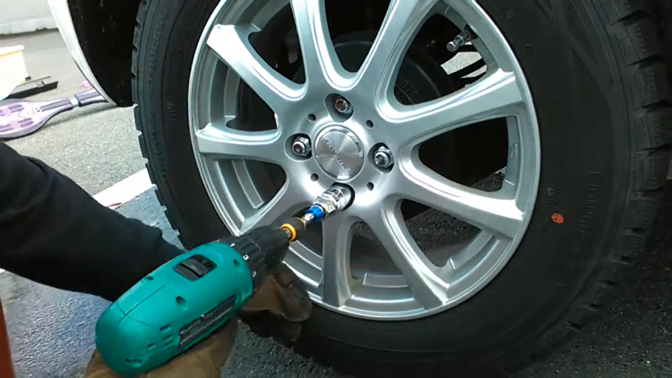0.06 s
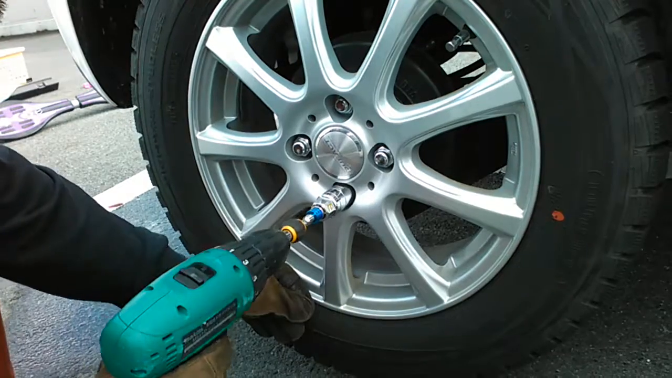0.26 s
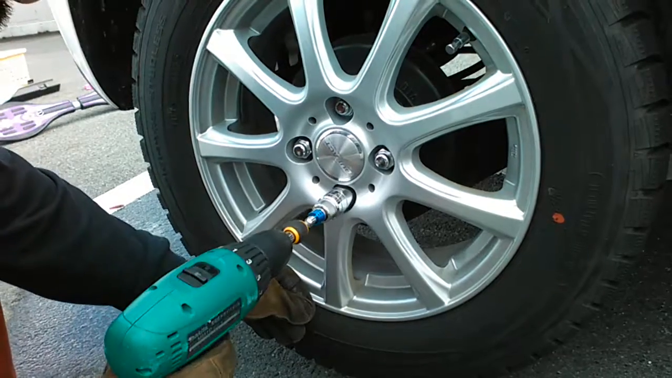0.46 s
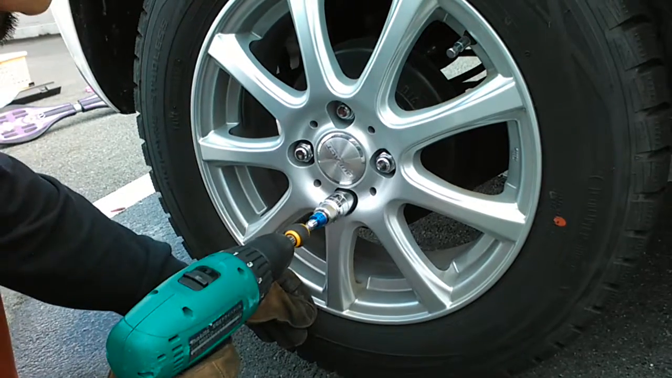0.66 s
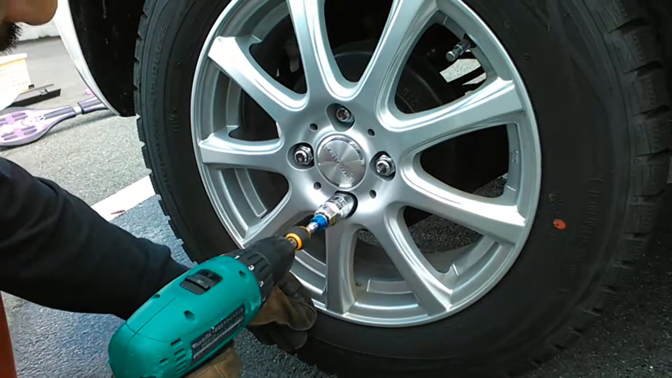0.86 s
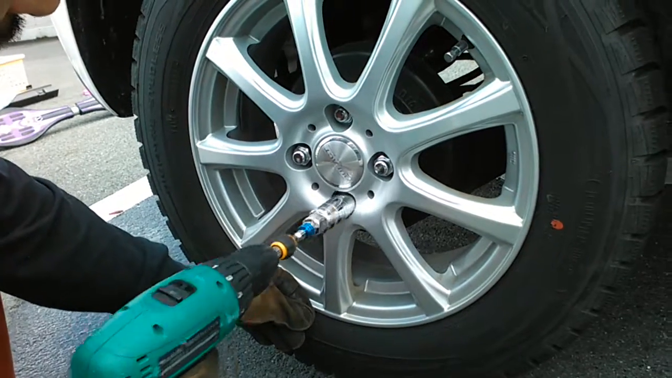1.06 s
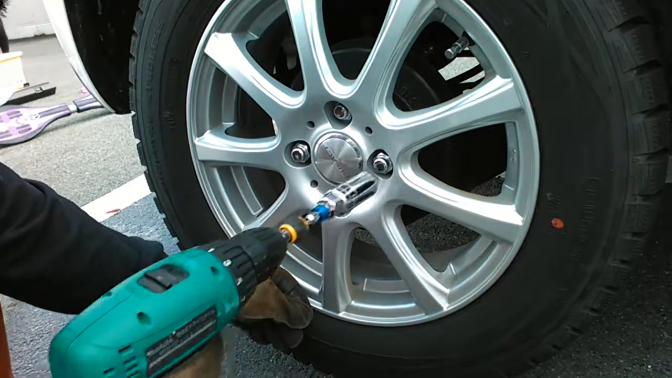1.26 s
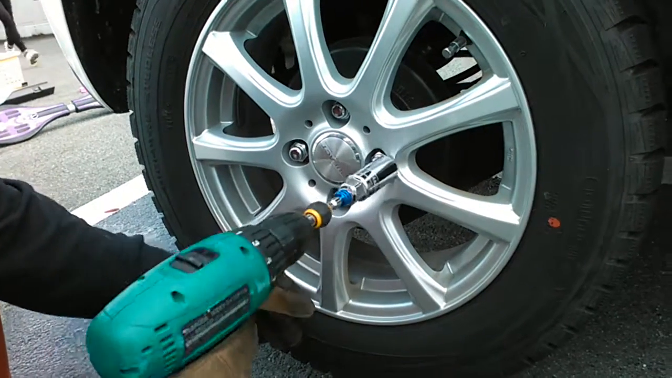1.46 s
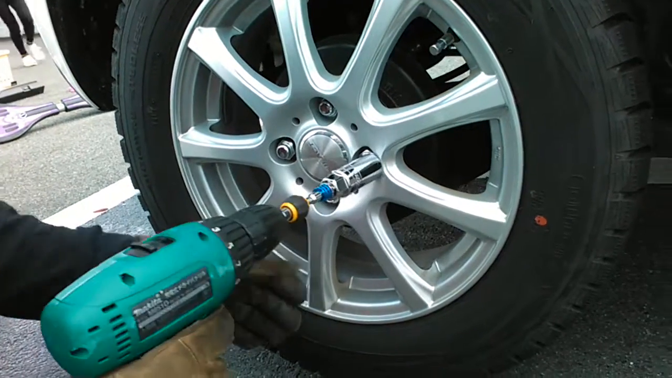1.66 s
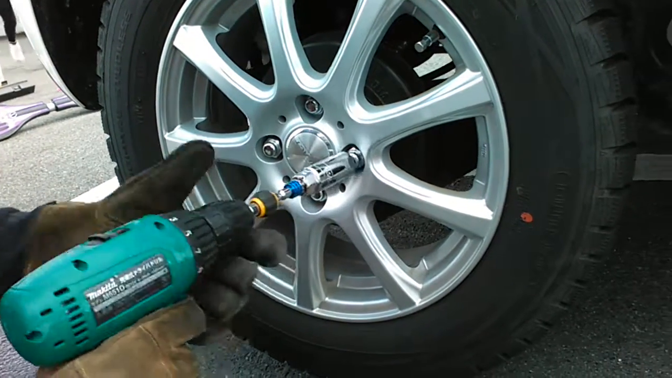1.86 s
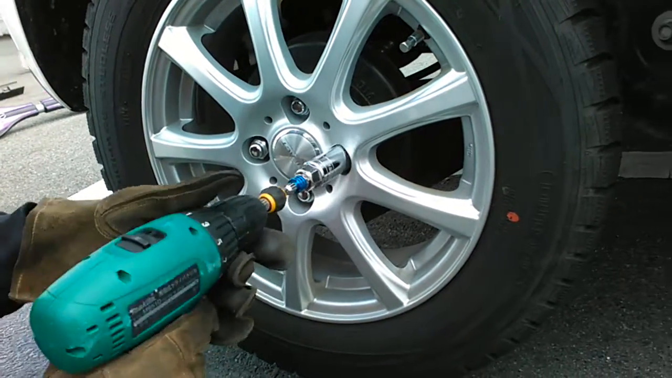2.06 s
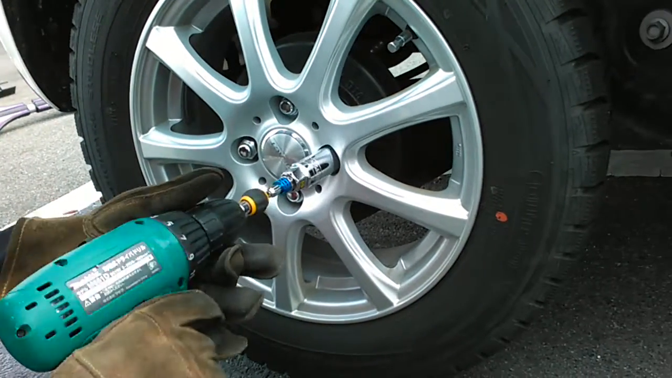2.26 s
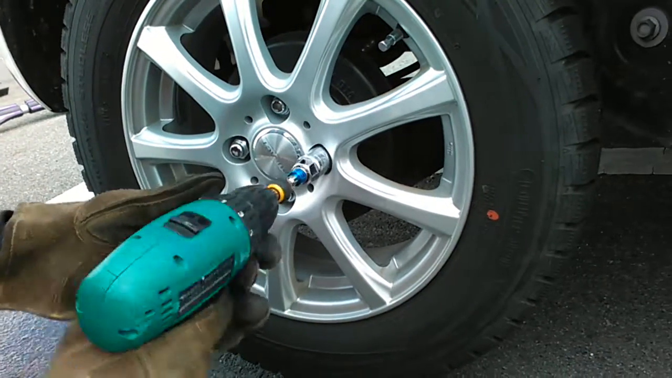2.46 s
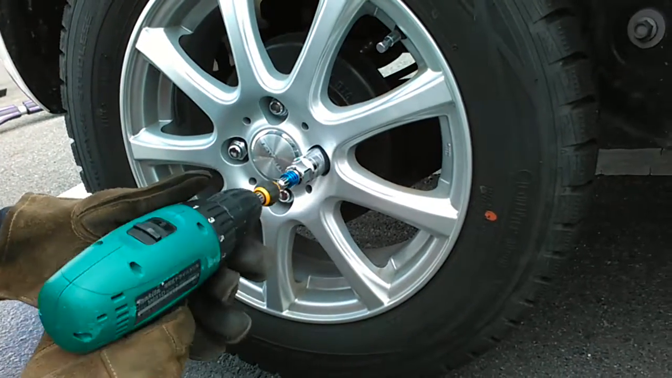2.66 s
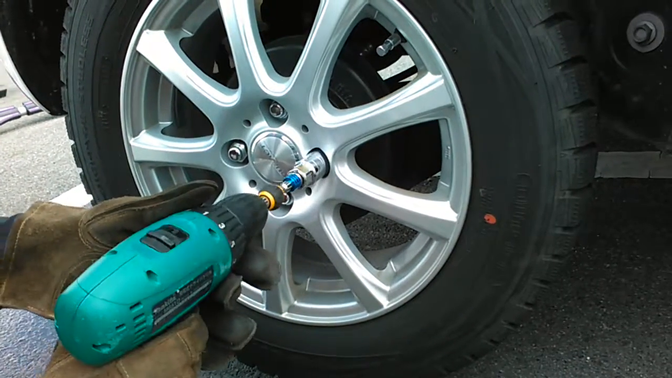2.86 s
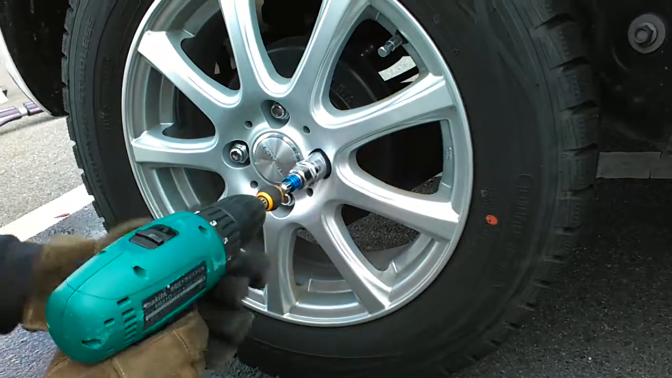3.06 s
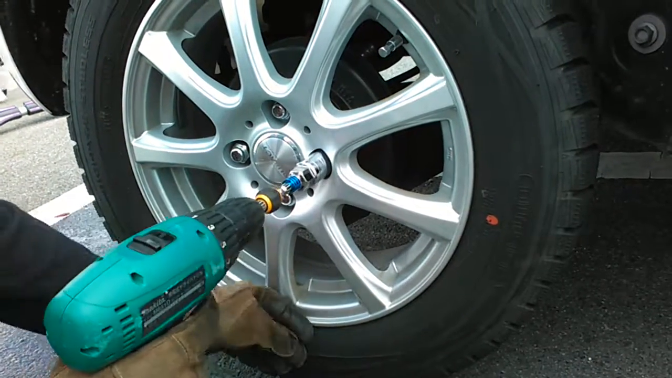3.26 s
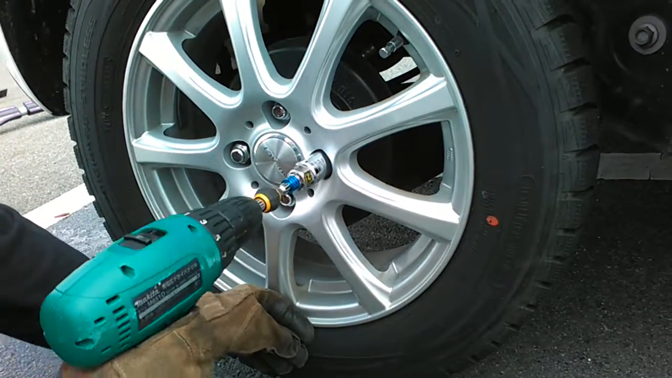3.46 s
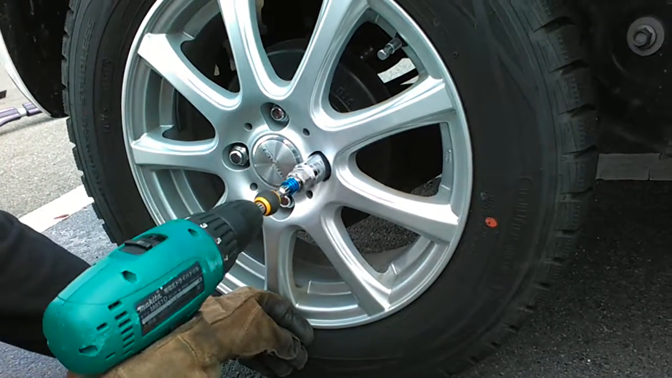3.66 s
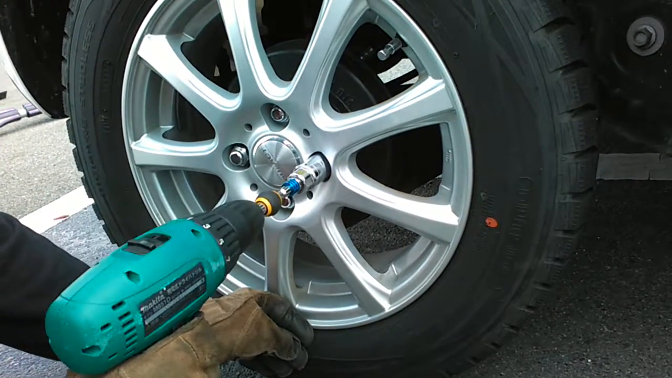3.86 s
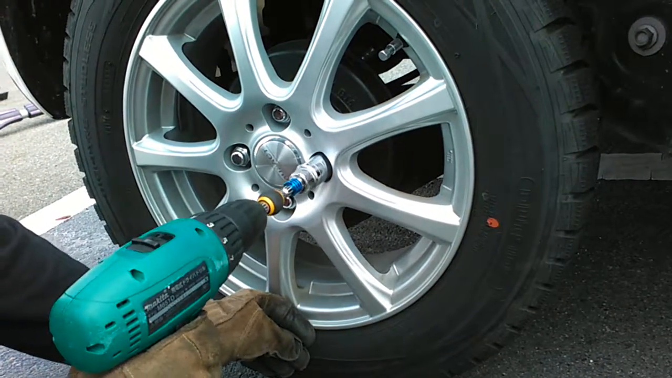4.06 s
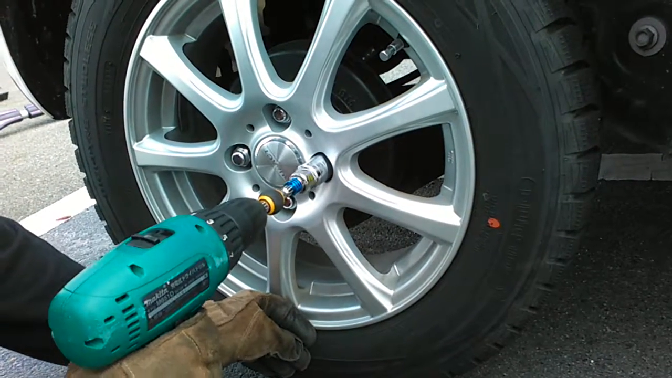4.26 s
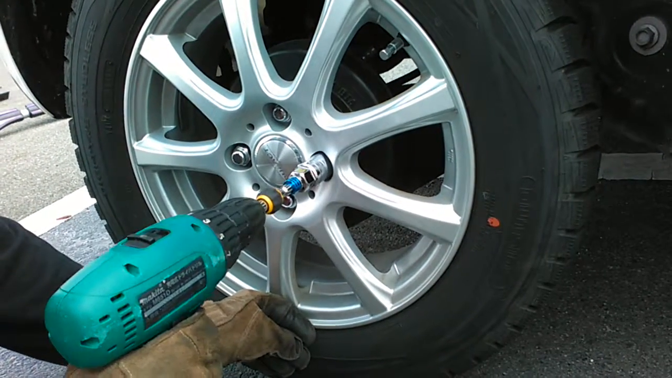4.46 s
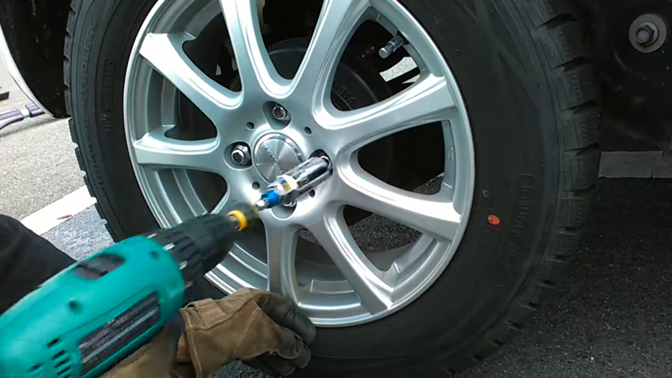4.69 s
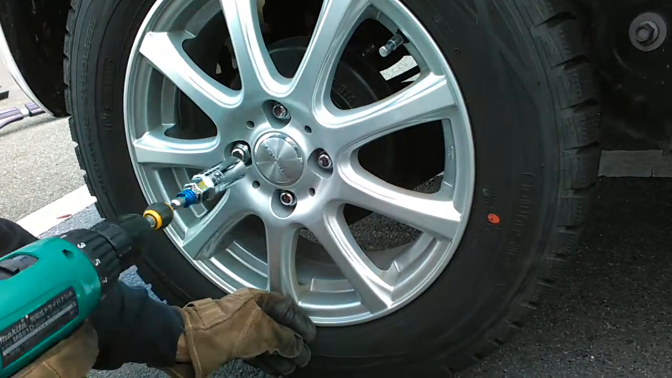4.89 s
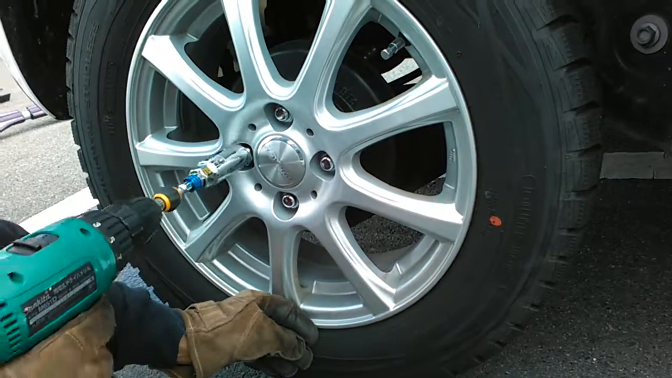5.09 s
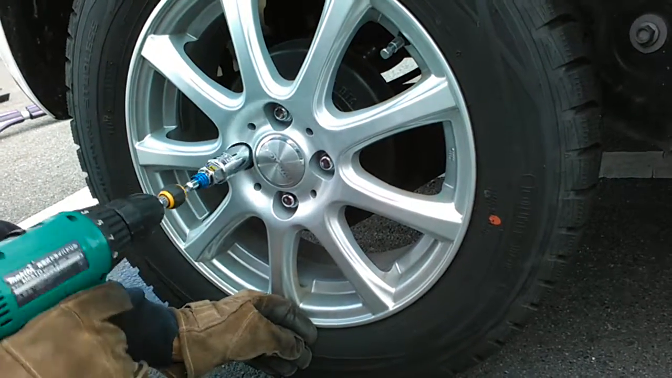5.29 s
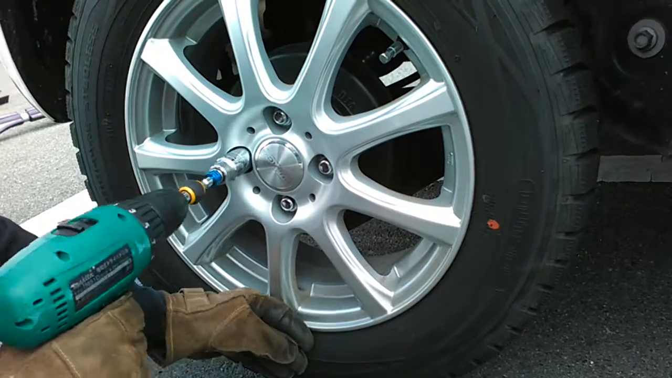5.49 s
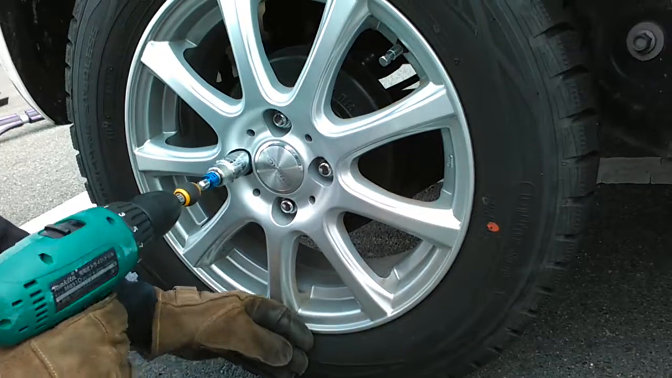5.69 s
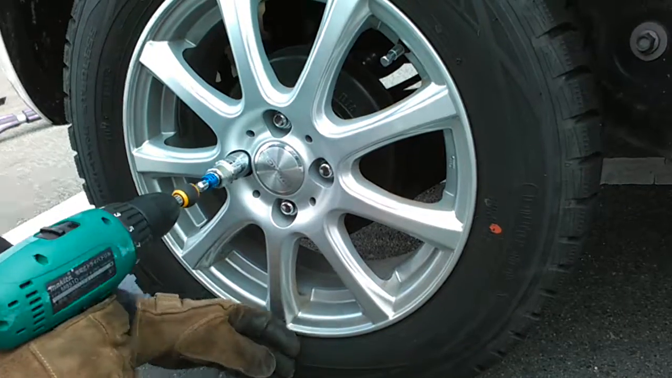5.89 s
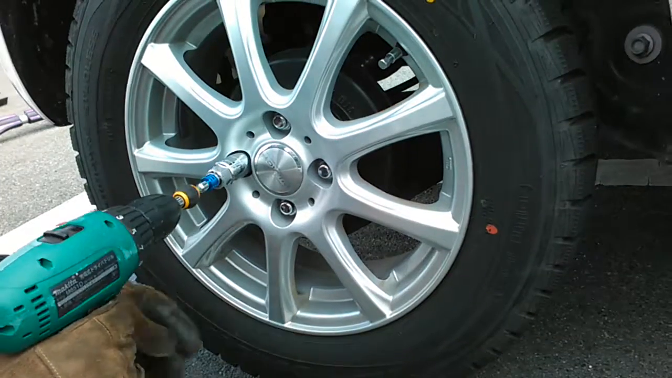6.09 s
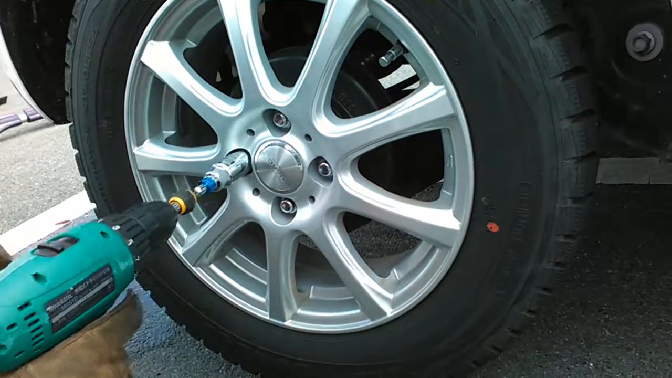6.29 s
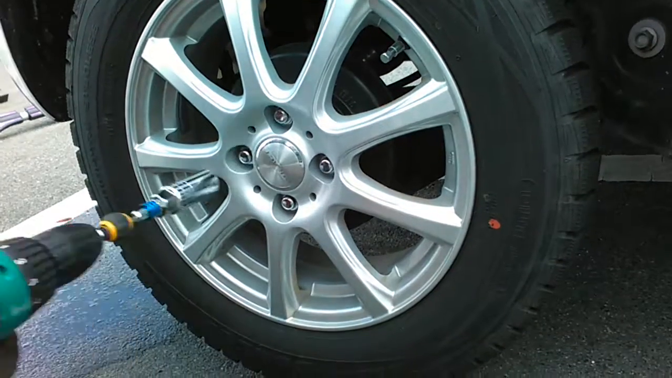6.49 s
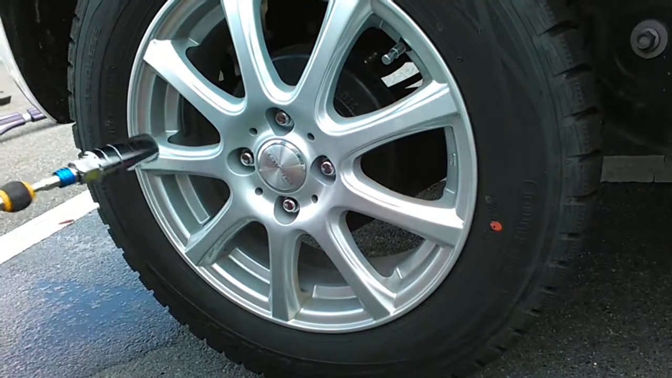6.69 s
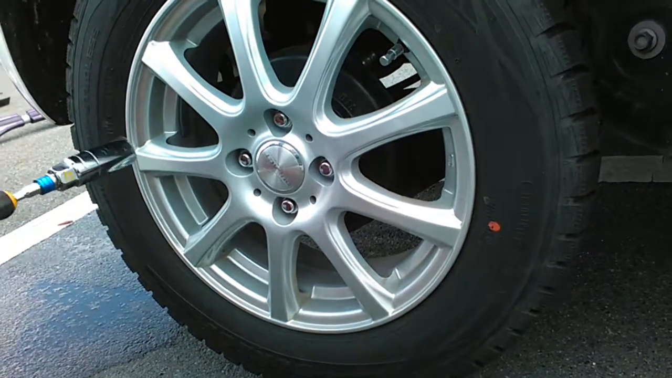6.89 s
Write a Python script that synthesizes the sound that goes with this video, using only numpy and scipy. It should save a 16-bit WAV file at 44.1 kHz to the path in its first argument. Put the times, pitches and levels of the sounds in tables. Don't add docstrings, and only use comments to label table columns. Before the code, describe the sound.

Close and dry outdoors, tiny contacts and a puff of wind come first. At 0.3 s a cordless driver whines up with hiss and light socket ticks; at 0.83 its clutch ratchets loudly, about 130 clicks a second, slowing and stopping by 1.1. The freed steel socket rings thin and high until a knock at 1.4. Small scrapes and knocks follow, stronger at 2.0-2.1 and a solid clunk at 2.46. From 2.64 the driver ratchets, eases and coasts to about 3.2. After clicks at 3.4 it runs in uneven, surging grinds with a faint electronic singing, then a firm ratchet from 4.35 to 4.65. The socket rings again; knocks and bright clinks come at 5.1-5.45. A whine and ticks from 5.5 lead to a sharp clink and final ratchet at 6.0-6.26, then a rattle, a ping and faint scrapes over distant traffic.

```python
import sys
import numpy as np
from scipy import signal
from scipy.fft import rfft, irfft, next_fast_len
from scipy.io import wavfile
from scipy.ndimage import uniform_filter1d

SR = 44100
rng = np.random.default_rng(int(sys.argv[2]) if len(sys.argv) > 2 else 0)


def ratio_of_db(decibels):
    return 10 ** (np.asarray(decibels, float) / 20)


def store_wav(level_fs):
    pcm = np.round(np.clip(np.atleast_2d(level_fs), -1, 1) * 32767)
    wavfile.write(sys.argv[1], SR, pcm.T.astype(np.int16))


N = 306054
T = np.arange(N) / SR


def unit(x):
    return x / np.sqrt(np.mean(x ** 2))


def track(tables, column, rest):
    y = np.full(N, 1. * rest)
    for rows in tables:
        times, values = np.array(rows, float)[:, [0, column]].T
        on = (T >= times[0]) & (T <= times[-1])
        y[on] = np.interp(T[on], times, values)
    return y


def coloured(points):
    hz, db = np.transpose(points)
    f = np.arange(N // 2 + 1) * SR / N + 1
    gain = ratio_of_db(np.interp(np.log(f), np.log(hz), db))
    return unit(irfft(rfft(rng.standard_normal(N)) * gain, N))


def band(x, hz, width):
    return signal.lfilter(*signal.iirpeak(hz, hz / width, fs=SR), x)


def walk(rate):
    hold = int(SR / rate)
    steps = np.repeat(rng.standard_normal(N // hold + 1), hold)
    return uniform_filter1d(steps, hold)[:N]


def tones(hz, orders, wobble_db, rise, body):
    phase = 2 * np.pi * np.cumsum(hz) / SR
    body_hz, body_db = np.transpose(body)
    out = np.zeros(N)
    for multiple, db in orders:
        level = ratio_of_db(db + wobble_db * walk(40) + np.interp(multiple * hz, body_hz, body_db))
        out += level * (hz / hz.max()) ** (rise * (multiple - 1)) * np.sin(multiple * phase)
    return out


def driver():
    rate = jump_rate()
    turns = np.cumsum(rate) / SR
    since = turns % 1 / rate
    ratchet, thud = clutch(turns)
    gear_gain, fan_gain, slip, thud_db = stages(rate)
    jolt = 1 + slip * (1.73 * np.exp(-since / 0.06) - .8)
    stall = slip * np.clip((104 - rate) / 18, 0, .95)
    jolt = jolt * (1 + stall * (3.2 * np.exp(-since / .0035) - 1))
    body = np.sqrt(slip) * ratchet + np.sqrt(1 - slip) * jolt * gears() + ratio_of_db(thud_db) * thud
    hiss = jolt * fan_hiss() + ratio_of_db(-11) * slip * ball_snaps(rate, since)
    return gear_gain * body + fan_gain * hiss + motor_whine() + chopped_current()


def jump_rate():
    # time_s, jumps_per_s
    feathered = [
        [(2.62, 75.5), (2.696, 101.6), (2.736, 112.8), (2.824, 120.9), (2.986, 123.0), (3.024, 115.6),
         (3.124, 88.2), (3.178, 83.5), (3.39, 50)],
        [(3.4, 104), (3.52, 131), (3.59, 115), (3.635, 121), (3.71, 104), (3.8, 114), (4.0, 110), (4.1, 118),
         (4.33, 113)],
    ]
    # start_s, let_go_s, first_jumps_per_s, top_jumps_per_s, coasting_loss (jumps/s per s)
    full_pulls = [
        (.81, 1.012, 120.4, 131.5, 425),
        (4.33, 4.635, 131, 131, 470),
        (5.98, 6.215, 124.3, 130.2, 490),
    ]
    catch_up_s, idle_jumps, last_jumps = .06, 100, 50
    rate = track(feathered, 1, idle_jumps)
    for start, off, first, top, loss in full_pulls:
        pull = top - (top - first) * np.exp(-np.abs(T - start) / catch_up_s) - loss * np.clip(T - off, 0, 1)
        rate = np.where((T >= start) & (T < off + .4), np.maximum(pull, last_jumps), rate)
    return rate


def clutch(turns):
    # pitch_hz, width_hz, level_db
    firm_modes = [(549, 74, -2.5), (988, 180, -5.5), (1300, 220, -5), (1600, 120, 2), (1923, 110, 4.5),
                  (2220, 140, 1), (2780, 350, -3)]
    # pitch_hz, width_hz, level_db
    loose_modes = [(555, 102, -4.2), (890, 92, -6), (1300, 210, -4), (1600, 140, 3), (1912, 170, 2.5),
                   (2250, 200, -4), (2840, 380, -3.5)]
    loose_from_s, loose_to_s = 2.5, 4.3
    jitter_s, scatter_db, rebound_db = .00003, 1.3, -19
    at = np.flatnonzero(np.diff(np.floor(turns)))
    chance = rng.standard_normal((4, len(at)))
    clicks, rebounds = np.zeros(N + 999), np.zeros(N + 999)
    click_at = at + 40 + (jitter_s * SR * chance[0]).astype(int)
    rebound_at = at + 150 + (8 * jitter_s * SR * chance[2]).astype(int)
    clicks[click_at] = ratio_of_db(scatter_db * chance[1])
    rebounds[rebound_at] = ratio_of_db(rebound_db + 2 * scatter_db * chance[3])
    hits = clicks[:N] + np.diff(rebounds[:N + 1]) * 4

    def housing(modes):
        return unit(sum((-1) ** k * ratio_of_db(db) * band(hits, hz, width) for k, (hz, width, db) in enumerate(modes)))

    ring = np.where((T > loose_from_s) & (T < loose_to_s), housing(loose_modes), housing(firm_modes))
    ring = signal.sosfilt(signal.butter(3, (420, 3300), "band", fs=SR, output="sos"), ring)
    thud = band(band(clicks[:N], 110, 86), 110, 86)
    return unit(ring), unit(thud)


def stages(rate):
    # start_s, let_go_s, gear_db, fan_db (at full speed), swell_s
    work = [(0.31, 0.818, -42.5, -33, 0.05), (0.828, 1.053, -34.5, -31, 0.0012),
            (1.108, 1.125, -59, -58, .0005), (2.639, 3.062, -32, -33, 0.012),
            (3.054, 3.17, -34, -31, 0.00077), (3.464, 3.6, -37, -33, 0.014),
            (3.599, 3.707, -34, -32.5, 0.0011), (3.736, 4.307, -37.5, -33.5, 0.0015),
            (4.356, 4.655, -34.5, -33.5, 0.0017), (4.69, 4.715, -49, -53, .0005),
            (5.474, 5.974, -44.5, -35.5, 0.032), (5.996, 6.261, -36, -33, 0.0026),
            (6.279, 6.29, -52, -50, 0.00055)]
    # thud_db, dying (dB per s after let-go)
    thuds = [(-43, 99.5), (-30, 194.5), (-39, 300), (-47, 200), (-40.5, 286), (-38, 100), (-40, 104),
             (-35, 65), (-22.5, 145), (-45, 400), (-41, 202.5), (-26.5, 220), (-45, 300)]
    slip_share = [.095, .84, .05, .92, .35, .5, .72, .1, .82, .05, .03, .76, .05]
    speed_db_per_octave, full_jumps = 12, 130
    now = np.maximum(np.searchsorted(np.array(work)[:, 0], T) - 1, 0)
    start, off, gear_db, fan_db, swell, thud_db, dying, slip = np.column_stack([work, thuds, slip_share])[now].T
    rise = (1 - np.exp(-np.clip(T - start, 0, 9) / swell)) ** 1.26
    gain = rise * ratio_of_db(speed_db_per_octave * np.log2(rate / full_jumps))
    lost_db = dying * np.clip(T - off, 0, 1)
    gear_gain = gain * ratio_of_db(gear_db - lost_db)
    fan_gain = gain * rise ** 0.9 * ratio_of_db(fan_db - 1.47 * lost_db)
    return gear_gain, fan_gain, slip, thud_db


def gears():
    # pitch_hz, level_db (per Hz)
    spectrum = [(100, -38.5), (200, -15.5), (300, -24), (550, -10.5), (1100, -8), (1430, 2.5), (1700, -2.5),
                (2100, 0), (2900, -4), (3400, -24), (4500, -18), (5800, -32)]
    surge_hz, surge_depth, surge_from_s, surge_to_s = 72, .45, 3.74, 4.33
    noise = unit(coloured(spectrum) * ratio_of_db(1.5 * walk(150) + 0.72 * walk(25)))
    surge = np.sin(2 * np.pi * np.cumsum(surge_hz * (1 + .08 * walk(12))) / SR)
    return noise * (1 + surge_depth * surge * (T > surge_from_s) * (T < surge_to_s))


def fan_hiss():
    # pitch_hz, level_db (per Hz)
    spectrum = [(2500, -32.5), (3300, -10.5), (4100, -7.5), (5100, -8), (5600, -15), (6300, -6), (8000, -7),
                (9000, -11), (10500, -3.5), (12000, 3.5), (13500, 1.5), (16000, -5.5)]
    return unit(coloured(spectrum) * ratio_of_db(2.0 * walk(600) + 1.1 * walk(30)))


def ball_snaps(rate, since):
    since_snap = (rate * since * 2) % 1 / rate / 2
    steel = band(rng.standard_normal(N), 12800, 2600)
    return unit(np.exp(-since_snap / 0.0006) * ratio_of_db(4.0 * walk(260)) * steel)


def motor_whine():
    # multiple (of commutator rate), first_run_db, second_run_db
    lines = [(1, -14, -12), (1.36, -2, 0), (2, 2, 1), (2.74, 3, 1), (4, 7, 1), (5, -8, 0), (6, -4, -3),
             (7, -8, -5), (8, -8, -8), (10, -5, 1), (12, 7, -1), (13, 1, 2), (14, 5, 3)]
    # pitch_hz, level_db
    shell = [(3000, -2.8), (3500, -14), (3750, -3.7), (5500, -11.5), (6300, 8), (7000, -3.5), (9300, -14),
             (9900, -5.5), (10600, 1.5), (11400, 4.2)]
    hz, gate, strain = run_up()
    orders = [(multiple, np.where(T < 3, first_db, second_db)) for multiple, first_db, second_db in lines]
    orders[0] = (1, orders[0][1] + 24 * strain)
    unsteady_hz = hz * (1 + .0008 * walk(60))
    return ratio_of_db(-53.5) * gate * tones(unsteady_hz, orders, wobble_db=3, rise=.6, body=shell)


def run_up():
    # start_s, end_s, top_hz, run_up_s, sag (Hz per s as the nut tightens)
    free_runs = [
        (.31, .83, 1070, .1, 125),
        (5.5, 6.0, 1014, .066, 0),
    ]
    start_hz = 510
    hz, gate, strain = np.full(N, 1000.), np.zeros(N), np.zeros(N)
    for start, end, top_hz, climb, sag in free_runs:
        on = (T >= start) & (T < end)
        t = T[on] - start
        hz[on] = top_hz - sag * t - (top_hz - start_hz) * np.exp(-(t / climb) ** 1.25)
        gate[on] = np.clip(t / climb, 0, 1) ** 2
        strain[on] = np.exp(-t / climb / 2)
    return hz, gate, strain


def chopped_current():
    # time_s, level_db
    loudness = [
        [(3.02, -65), (3.04, -44), (3.155, -44), (3.175, -77)],
        [(3.5, -77), (3.71, -64), (3.73, -50), (4.3, -46.5), (4.4, -48), (4.65, -55.5)],
    ]
    # multiple (of switching rate), level_db
    orders = [(2, -1), (3, -5), (6, 0.5)]
    hz = 2086 * (1 + .0016 * walk(30))
    return ratio_of_db(track(loudness, 1, -140)) * tones(hz, orders, wobble_db=1.5, rise=0, body=[(0, 0)])


def knocks():
    # start_s, dull_db,
    # bright_db, strongest_hz
    sharp_blows = [(.007, -47, -76, 1310), (.02, -42.5, -61, 1980), (.185, -53.5, -71, 1050),
                   (1.42, -24.5, -36.5, 1480), (1.437, -58, -53, 12000), (1.123, -53, -66, 2950),
                   (1.557, -57, -72, 860), (1.658, -58, -72, 880), (1.931, -55, -66, 1630),
                   (1.958, -48, -66, 1500), (1.578, -44.5, -57, 1410), (1.83, -44, -47, 1110),
                   (1.947, -44, -64, 1250), (2.019, -24, -43, 1460), (2.078, -29, -30.5, 1030),
                   (2.119, -28, -29, 1870), (2.463, -15.5, -34, 1560), (2.569, -41.5, -53, 1120),
                   (2.604, -44, -56, 1440), (2.646, -40, -34, 1650), (3.418, -42, -48.5, 3820),
                   (3.439, -31.5, -40, 2600), (3.486, -31, -29.5, 1810), (5.11, -23, -38.5, 1680),
                   (5.136, -40, -38, 1790), (5.26, -49, -71, 1660), (5.449, -18.5, -28, 1560),
                   (5.474, -30, -40, 1570), (6.268, -25, -31, 2100), (6.274, -26, -30.5, 2100),
                   (6.286, -28.5, -32, 2100), (6.295, -26.5, -30, 2090), (6.309, -31.5, -37, 2100),
                   (6.33, -48, -44, 1504), (6.731, -42.5, -52.5, 2550)]
    # start_s, dull_db, bright_db, strongest_hz
    steel_clinks = [(.607, -53, -30, 11800), (1.1, -29.5, -50, 9600), (1.129, -36, -76, 9400),
                    (2.102, -29, -34, 12000), (2.272, -33.5, -36, 12000), (4.29, -45, -25, 11750),
                    (4.348, -33, -23, 11100), (4.709, -32, -36, 2600), (4.74, -48, -56, 10800),
                    (5.174, -38.5, -36, 1900), (5.201, -46, -23.5, 9500), (5.413, -38, -36.5, 14000),
                    (5.991, -29, -25, 10500), (6.346, -35, -49, 10300), (6.38, -29, -29.5, 5640),
                    (5.195, -43, -33, 9600), (6.434, -42, -50, 9900)]
    # start_s, dull_db, bright_db, strongest_hz
    scrapes = [(.105, -66, -68, 1140), (.31, -54, -58, 1530), (1.219, -70, -73, 2690),
               (1.259, -71.5, -73, 1095), (1.699, -61, -54, 6540), (1.928, -71, -78, 1210),
               (2.26, -57, -54, 8500), (2.288, -54.5, -83, 2150), (2.409, -62.5, -62.5, 1070),
               (2.625, -50, -50, 1500), (3.452, -48.5, -46, 1800), (1.605, -71, -79, 1476),
               (1.97, -72, -76.5, 1200), (4.85, -82, -76, 2000), (3.264, -62, -64, 2600),
               (3.245, -73, -73, 2600), (3.208, -52, -49, 2630), (5.153, -51.5, -39, 1780),
               (5.193, -41.5, -43, 1860), (5.296, -58, -52, 1820), (5.305, -51, -41, 9400),
               (5.349, -53, -54, 1930), (6.788, -67.5, -70, 2750), (6.849, -71.5, -71, 2900),
               (6.81, -68.5, -70, 2600), (6.91, -73, -72, 2000)]
    # start_s,
    # level_db, # pitch_hz
    adapter_pings = [(.607, -25, 11700), (1.096, -34, 10200), (2.42, -58, 11400), (3.486, -23, 12300),
                     (4.291, -18, 11800), (4.348, -18, 11870), (4.74, -51, 10500), (5.338, -42, 9250),
                     (5.11, -23.5, 1810), (5.991, -15.5, 11280), (6.434, -44, 11200)]
    # start_s, level_db, pitch_hz
    socket_ticks = [(.517, -32, 8000), (.549, -28, 8250), (.622, -32, 7200), (.664, -32, 7800),
                    (.733, -31, 8090), (.808, -36.5, 7350), (5.474, -37, 7860), (5.496, -41, 8140),
                    (5.573, -34, 8100), (5.653, -34, 8200), (5.7, -35, 7850), (5.807, -40, 8300),
                    (5.832, -36, 8200), (5.886, -36, 8130), (5.904, -36, 8100)]
    sharp = dict(t60=0.096, crack=0.76, rise_s=.0001, low_db=5.0, high_db=3.0, peak_db=6.0)
    out = ratio_of_db(1.5 * walk(350)) * contacts(sharp_blows, **sharp)
    out += ratio_of_db(1.5 * walk(350)) * contacts(steel_clinks, **sharp)
    drags = contacts(scrapes, t60=0.14, crack=0, rise_s=0.0042, low_db=10.5, high_db=0.5, peak_db=8.5)
    out += ratio_of_db(1.4 * walk(280)) * drags
    return out + wheel() + pings(adapter_pings, fade_s=.0011) + pings(socket_ticks, fade_s=0.0006)


def contacts(events, t60, crack, rise_s, low_db, high_db, peak_db):
    # pitch_hz, width_hz, level_db
    recess = [(1560, 570, 1.5), (1820, 300, 4.5), (2900, 680, -1), (746, 510, -2.5)]
    size = 9000
    low, high, t = np.zeros(N + 9999), np.zeros(N + 9999), T[:size]
    tail = np.exp(-np.log(1000) * t / t60)
    fade = np.clip(t / rise_s, 0, 1) * (crack * np.exp(-t / 0.00036) + (1 - crack) * tail)
    bright_fade = fade * tail ** 0.36
    for s, dull_db, bright_db, hz in events:
        dull_grit, bright_grit = rng.standard_normal((2, size))
        here = slice(int(s * SR), int(s * SR) + size)
        low[here] += ratio_of_db(dull_db) * fade * dull_grit
        high[here] += ratio_of_db(bright_db + high_db) * bright_fade * np.diff(bright_grit, prepend=0)
        own = band(fade * bright_grit, hz, 150 + .04 * hz)
        high[here] += ratio_of_db(max(dull_db, bright_db) + peak_db) * own * np.sqrt(9000 / hz)
    low = low[:N]
    hollow = sum((-1) ** k * ratio_of_db(db) * band(low, hz, width) for k, (hz, width, db) in enumerate(recess))
    return ratio_of_db(low_db) * hollow + high[:N]


def wheel():
    # pitch_hz, level_db, t60_s
    modes = [(1095, -4, 0.44), (1600, 1, 0.34), (2960, 14, 0.17), (1780, 8.5, 0.12)]
    # start_s, level_db, nearest_hz
    spoke_blows = [(1.423, -54, 1240), (2.021, -73, 2900), (2.123, -59, 1780), (2.463, -46, 1300),
                   (5.108, -74, 1800), (5.449, -54, 1600)]
    t = T[:SR // 2]
    out = np.zeros(N + len(t))
    for s, blow_db, near_hz in spoke_blows:
        start = int(s * SR)
        ring = np.zeros(len(t))
        for hz, db, t60 in modes:
            far_db = 14 * abs(np.log2(hz / near_hz))
            ring += ratio_of_db(db - far_db - 60 * t / t60) * np.sin(2 * np.pi * hz * t)
        flicker = ratio_of_db(3.0 * walk(60)[start:start + len(t)])
        out[start:start + len(t)] += ratio_of_db(blow_db) * flicker * ring
    return out[:N]


def pings(events, fade_s):
    t = T[:900]
    swell = t / fade_s * np.exp(1 - t / fade_s) * .75
    out = np.zeros(N + len(t))
    for s, db, hz in events:
        start = int(s * SR)
        out[start:start + len(t)] += ratio_of_db(db) * swell * np.sin(2 * np.pi * hz * t)
    return out[:N]


def socket():
    # struck_s, damped_s, level_db, upper_db (upper mode against lower)
    rings = [(1.097, 1.418, -48, -21), (2.023, 2.09, -56.5, -32), (4.691, 5.11, -47.5, -40),
             (5.153, 5.217, -50, -24), (5.308, 5.328, -49, -20), (6.442, 6.725, -66, -28)]
    mode_hz, mode_t60_s = (9254, 11450), (0.7, 0.9)
    out = np.zeros(N)
    for s, end, db, upper_db in rings:
        t = T - s
        gate = np.clip(t / .002, 0, 1) * np.clip((end - T) / .004, 0, 1)
        sway = 1 + 0.52 * np.cos(2 * np.pi * 12.26 * t)
        for hz, t60, level_db in zip(mode_hz, mode_t60_s, (db, db + upper_db)):
            out += ratio_of_db(level_db - 60 * np.clip(t, 0, 2) / t60) * gate * sway * np.sin(2 * np.pi * hz * T)
    return out


def gusts():
    # peak_s, boom_db, flutter_db, rise (dB per s), fall (dB per s)
    puffs = [(0.125, -59, -53.5, 900, 200), (0.18, -57, -70, 302, 164), (0.847, -60.5, -45, 1497, 500),
             (2.72, -86, -54.5, 307, 300), (3.18, -78.5, -65, 307, 299), (4.918, -61, -66.5, 303, 190),
             (5.5, -67, -66, 92, 68), (6.77, -74, -102, 150, 97.5)]
    boom, flutter = (unit(band(band(rng.standard_normal(N), hz, hz), hz, hz)) for hz in (60, 190))
    flutter = flutter * ratio_of_db(1.9 * walk(65))
    out = np.zeros(N)
    for s, boom_db, flutter_db, rise, fall in puffs:
        shape = ratio_of_db(-np.maximum(rise * (s - T), fall * (T - s)))
        out += shape * (ratio_of_db(boom_db) * boom + ratio_of_db(flutter_db) * flutter)
    return out


def street():
    # time_s, level_db
    loudness = [(0, -70), (.6, -64.5), (1.6, -74), (2.5, -65.5), (3.35, -73.5), (4.8, -72), (5.5, -70),
                (6.4, -66), (6.6, -86), (6.94, -85.5)]
    # pitch_hz, level_db (per Hz)
    rumble = [(30, -46), (48, -15), (80, -2), (140, -11.5), (200, -3.5), (300, -19), (500, -14.5),
              (800, -34.5)]
    # pitch_hz, level_db (per Hz)
    rustle = [(200, -26.5), (500, 1.5), (1000, -2), (2000, -5), (4000, -12.5), (8000, -13), (12000, -9.5),
              (16000, -12.5)]
    traffic = ratio_of_db(track([loudness], 1, -99) + 1.2 * walk(7.1)) * coloured(rumble)
    return traffic + ratio_of_db(-77.5 + 0.89 * walk(31)) * coloured(rustle)


def hums():
    # pitch_hz, from_s, to_s, level_db
    machines = [(206, 0.52, 1.19, -67), (362, 6.0, 8.2, -88.5)]
    out = np.zeros(N)
    for hz, start, end, db in machines:
        gate = np.clip(np.minimum(T - start, end - T) / 0.044, 0, 1)
        out += ratio_of_db(db + 4.5 * walk(12.0)) * gate * np.sin(2 * np.pi * hz * T)
    return out


def scene():
    near = driver() + knocks() + socket()
    bounce = rng.standard_normal(2600) * np.exp(-T[:2600] / .006)
    echo = signal.fftconvolve(near, bounce / np.linalg.norm(bounce))[:N]
    mid = near + ratio_of_db(-19) * echo + gusts() + street() + hums()
    turning = signal.hilbert(mid, next_fast_len(N))[:N] * np.exp(4j * walk(120))
    treble = signal.butter(12, 6000, "high", fs=SR, output="sos")
    side = ratio_of_db(-5.7) * signal.sosfilt(treble, turning.real)
    return np.array([mid + side, mid - side])


def top_cut(x):
    return signal.sosfilt(signal.butter(12, 15560, fs=SR, output="sos"), x)


def record(dry):
    cut = signal.sosfilt(signal.ellip(10, .3, 60, 14200, fs=SR, output="sos"), dry)
    cut = signal.sosfilt(signal.butter(3, 38, "high", fs=SR, output="sos"), cut)
    return top_cut(cut)


dry = scene()
out = record(dry)
store_wav(out)
```